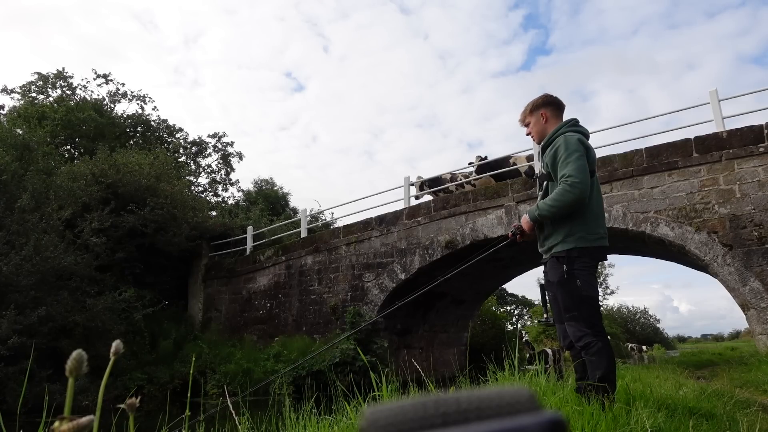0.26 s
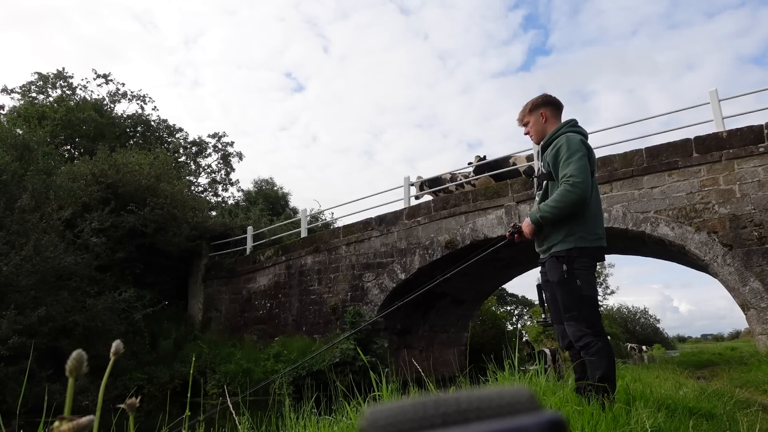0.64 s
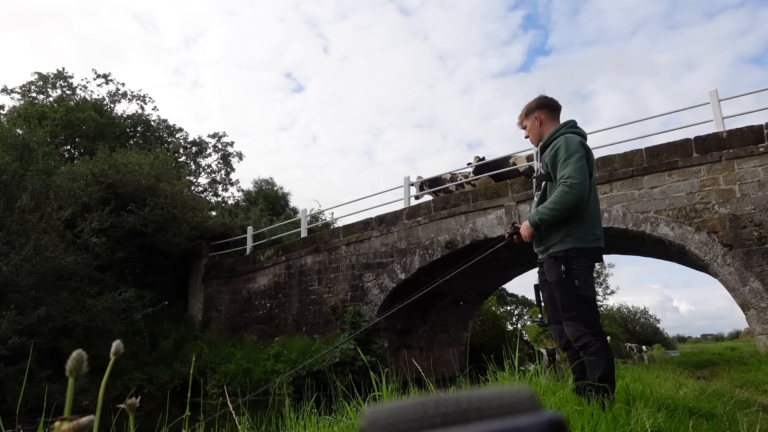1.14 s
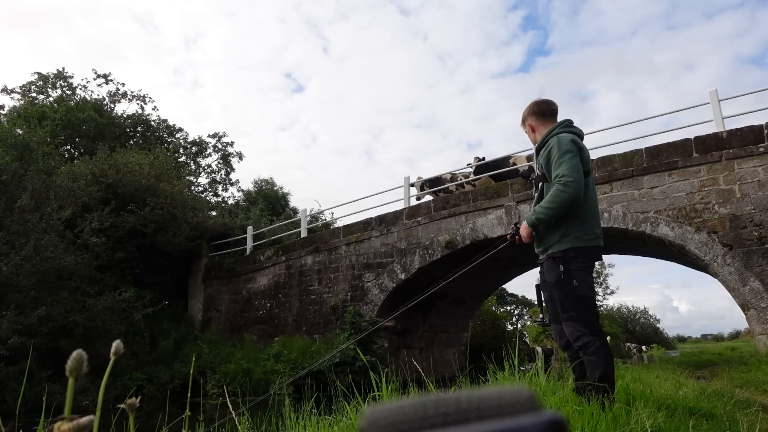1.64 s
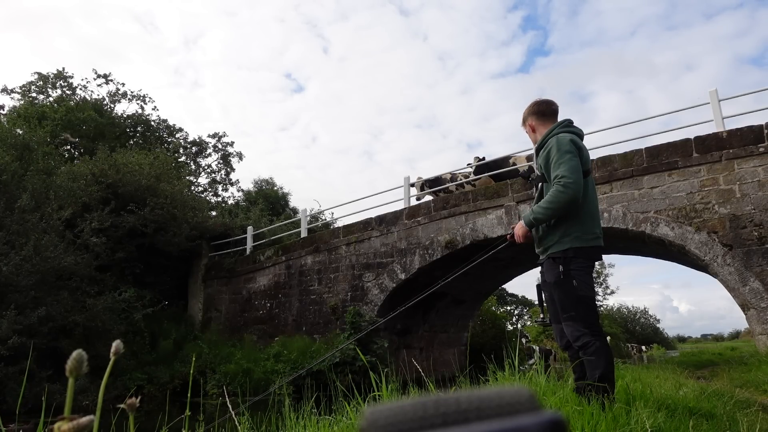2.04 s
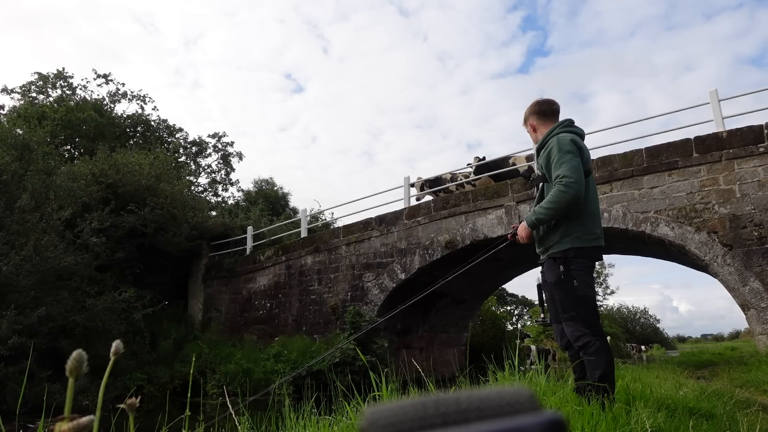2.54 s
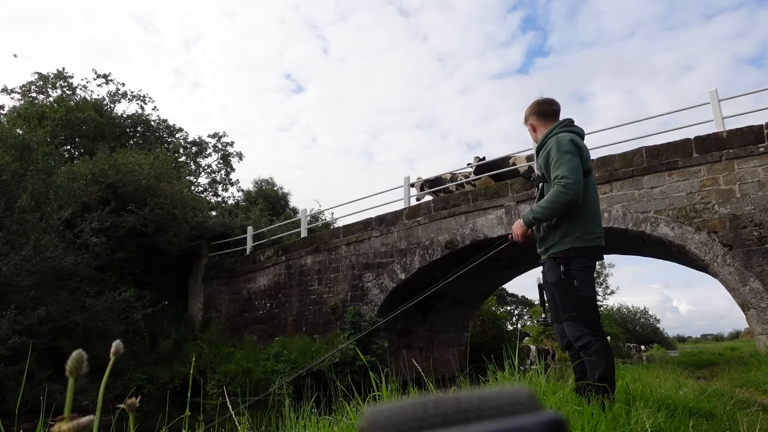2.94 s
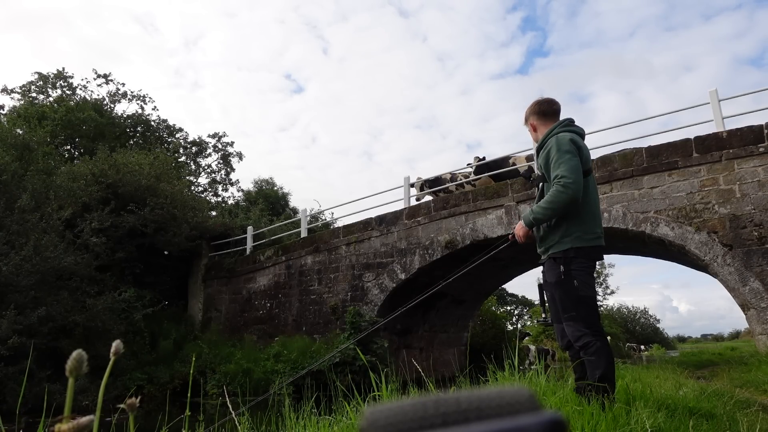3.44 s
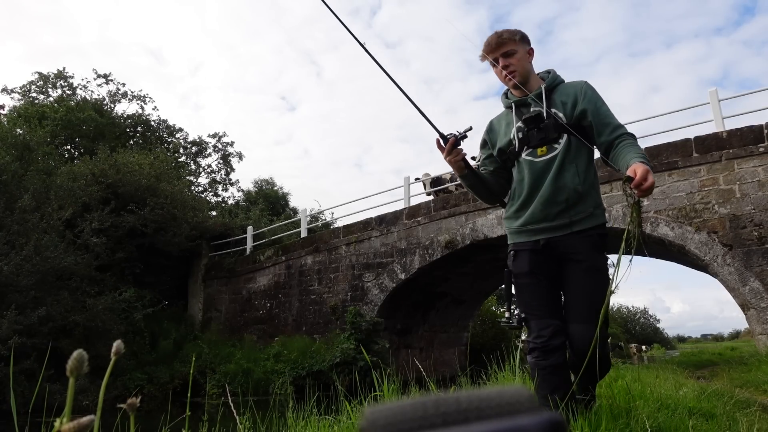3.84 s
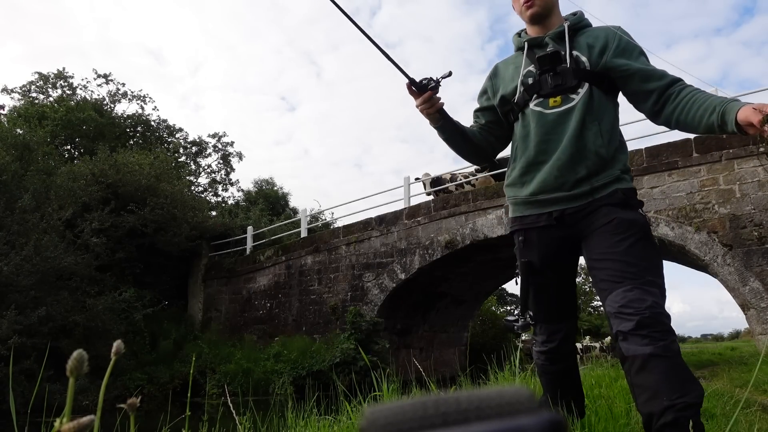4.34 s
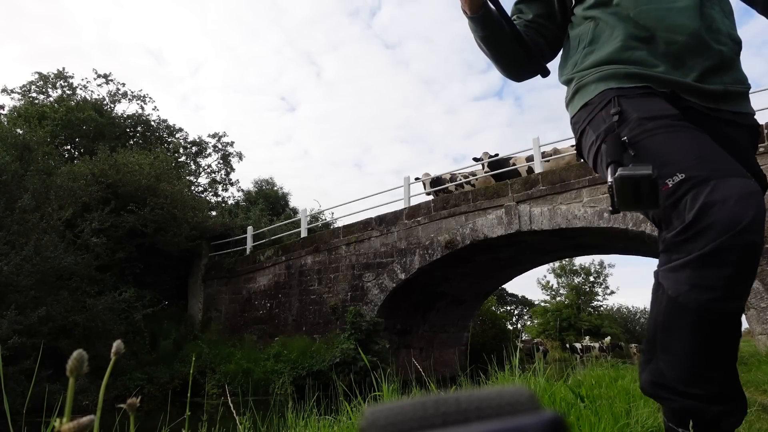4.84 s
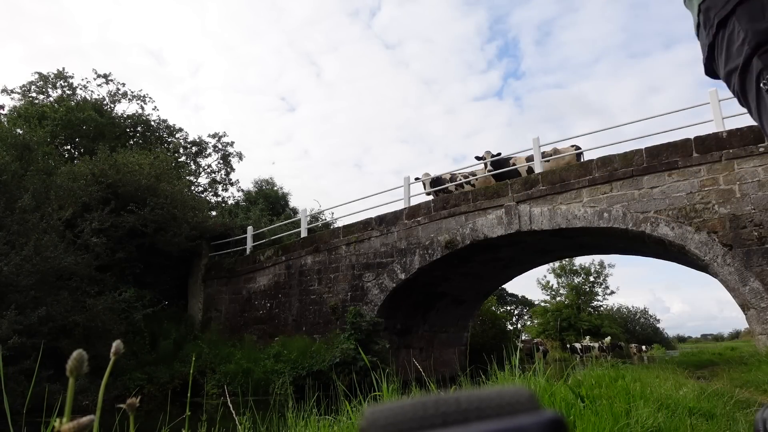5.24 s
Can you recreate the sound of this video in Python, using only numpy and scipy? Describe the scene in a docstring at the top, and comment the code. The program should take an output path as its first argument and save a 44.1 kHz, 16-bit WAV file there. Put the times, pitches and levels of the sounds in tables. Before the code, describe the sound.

Cows on a stone bridge bellow hoarsely and moo low while a small bird chirps, water drips, and an angler walks through grass with clicking tackle.

```python
"""By a stone canal bridge, cows call a little to the right: hoarse bellows and low moos, one breaking into a high register.
The moos are vocal-fold buzz and breath through throat resonances; the bellows are a strained tone over rasping noise.
A small bird sings in gliding notes to the left and water off weed trickles, splashes and drips as shaped noise.
An angler walks through grass in swishes and treads of grainy noise; his tackle clicks as short rings and
one rubber boot creaks by stick and slip. Soft noise is the air around the stereo microphone."""
import sys
import numpy as np
from scipy import signal
from scipy.fft import rfft, irfft
from scipy.io import wavfile
from scipy.ndimage import uniform_filter1d, map_coordinates

SR = 44100
rng = np.random.default_rng(int(sys.argv[2]) if len(sys.argv) > 2 else 0)


def put_to_file(sound):
    """Save the sound as 16-bit audio at rate SR, in the file named by the first command-line argument."""
    columns = np.atleast_2d(sound).T  # one column per channel
    safe = np.clip(columns, -1, 1)
    whole_steps = np.round(safe * 32767)
    wavfile.write(sys.argv[1], SR, whole_steps.astype(np.int16))


N = 241607
TIME = np.arange(N) / SR
BINS = np.fft.rfftfreq(4096, 1 / SR)  # filter frequencies in Hz


def amp(db):
    """Amplitude factor of a level in dB."""
    return 10 ** (np.asarray(db) / 20)


def unit(x):
    """Scaled to an RMS of one."""
    return x / np.sqrt(np.mean(x ** 2) + 1e-20)


def read(points, hz):
    """A short spectrum, joined on a log-frequency axis."""
    f, value = np.transpose(points)
    return np.interp(np.log(hz + 1), np.log(f + 1), value)


def controls(rows):
    """Sample times and every column of a curve table."""
    s, *columns = np.transpose(rows)
    t = np.arange(s[0], s[-1], 1 / SR)
    return [t] + [np.interp(t, s, c) for c in columns]


def placed(s, sound):
    """A sound set at its moment in silence."""
    return np.concatenate([np.zeros(max(round(s * SR), 0)), sound, np.zeros(N)])[:N]


def faded(x, size=400):
    """Smooth fades at both ends, size samples in all."""
    return x * signal.windows.tukey(len(x), min(1, size / len(x)))


def wander(size, hz):
    """Random drift up to about hz, of unit RMS over the whole scene's length."""
    f = np.fft.rfftfreq(N, 1 / SR)
    return unit(irfft(rfft(rng.standard_normal(N)) / (1 + (f / hz) ** 4), N))[:size]


def colour(x, db, lag=1):
    """Causal filter shaped by db on BINS, its peak set to 0 dB; lag above 1 makes resonances build up late."""
    log_gain = np.log(amp(np.maximum(db - db.max(), -100)))
    z = signal.hilbert(np.r_[log_gain, log_gain[-2:0:-1]])
    taps = np.fft.ifft(np.exp(z.real - 1j * lag * z.imag)).real
    return signal.oaconvolve(x, taps[:len(BINS)])[:len(x)]


def band(x, lo_hz, hi_hz):
    """Band-pass filter without delay."""
    return signal.sosfiltfilt(signal.butter(4, [lo_hz, hi_hz], "band", fs=SR, output="sos"), x)


def loudness(x, size=1300):
    """Running RMS, smoothed twice over size samples."""
    power = uniform_filter1d(uniform_filter1d(x ** 2, size), size)
    return np.sqrt(abs(power) + 1e-14)


def swells(events, attack_s, fall_db_per_s):
    """Joint gain of events (start, length, dB) that each rise, hold and die away."""
    gains = []
    for s, length, db in events:
        rise = np.clip((TIME - s) / attack_s, 0, 1)
        gains.append(rise * amp(db - fall_db_per_s * np.maximum(TIME - s - length, 0)))
    return np.linalg.norm(gains, axis=0)


def ears(left_db):
    """Gains of the left and right microphone, left_db apart."""
    return amp([[left_db / 2], [-left_db / 2]])


# Decay of the scatter. Each row: frequency in Hz, time to fall by 60 dB in seconds.
SCATTER_DECAY = [(100, 0.24), (500, 0.74), (2000, .4), (7000, 0.5), (16000, 0.053)]


def outdoors(x, left_db, wet_db, delay_s=0.011):
    """Direct sound, and scatter from the bridge and trees that differs at each ear and holds little bass."""
    taps = rng.standard_normal((2, SR // 2)) * (rng.random((2, SR // 2)) < .05)
    hz, t, z = signal.stft(taps, SR, nperseg=256)
    scatter_db = read([(100, -13.5), (300, -17.0), (900, 2.0), (3000, 7), (16000, 2.0)], hz)[:, None]
    decay_db = -60 * t / read(SCATTER_DECAY, hz)[:, None]
    tail = signal.istft(z * amp(scatter_db + decay_db), SR)[1]
    tail = np.pad(tail / np.linalg.norm(tail[0]), ((0, 0), (int(delay_s * SR), 0)))
    scatter = signal.fftconvolve(x[None], tail, axes=1)[:, :N]
    return ears(left_db) * x + amp(wet_db) * scatter


def rustle(gain, spectrum, grains_per_s, grain_db, same, left_db):
    """A wash of countless tiny contacts with sparse larger ones; same is the power share common to both ears."""
    sizes = amp(4.3 * np.minimum(rng.exponential(1, (3, N)), 3.5)) * rng.standard_normal((3, N))
    grains = unit(sizes * (rng.random(sizes.shape) < grains_per_s / SR))
    drive = rng.standard_normal(sizes.shape) + amp(grain_db) * grains
    shared, *own = (faded(gain * unit(colour(d, read(spectrum, BINS)))) for d in drive)
    return ears(left_db) * (np.sqrt(same) * shared + np.sqrt(1 - same) * np.array(own))


def ticks(rows, rise_s, top_hz):
    """Brief bursts that die away, each coloured by one ring and dulled above top_hz."""
    out, t = np.zeros(N), TIME[:SR // 8]
    for s, db, hz, t60, sharpness in rows:
        burst = rng.standard_normal(len(t)) * amp(-60 * t / t60) * (1 - np.exp(-t / rise_s))
        detune = (BINS + 1) / hz - hz / (BINS + 1)
        ring_loss = 1 + (sharpness * detune) ** 2
        treble_loss = 1 + (BINS / top_hz) ** 8
        tick = colour(burst, -10 * np.log10(ring_loss * treble_loss))
        out += placed(s, amp(db) * tick / abs(tick).max())
    return out


def whistle(t, hz, db, jitter):
    """A nearly pure, slightly unsteady tone."""
    turns = np.cumsum(hz * (1 + jitter * wander(len(t), 180))) / SR
    return placed(t[0], faded(np.sqrt(2) * amp(db) * np.sin(2 * np.pi * turns)))


# Air around the microphone. Each row: frequency in Hz, relative level in dB.
AIR_COLOUR = [(25, -32.5), (50, -18.5), (97, -2), (170, -6.5), (285, -1), (650, 0), (900, -14.5),
              (1500, -9.5), (2000, -17.5), (3600, -23.5), (6000, -25.5), (9000, -35), (16000, -39)]


def open_air():
    """Steady coloured noise with sparse grains, about half of it shared by the ears."""
    return rustle(amp(-55), AIR_COLOUR, 300, grain_db=-21.5, same=0.57, left_db=-0.5)


# Bird notes. Each row: start in seconds, length in seconds, start pitch in Hz, end pitch in Hz, peak level in dB.
BIRD_NOTES = [(0.441, .053, 6250, 7080, -56.5), (.469, 0.077, 7070, 6740, -57.5),
              (0.549, 0.093, 6780, 7000, -57.5), (0.734, 0.056, 5440, 5270, -60),
              (.778, 0.028, 4830, 3840, -59), (0.832, 0.047, 4870, 5550, -57.5),
              (0.933, 0.04, 5630, 5650, -47.5), (0.969, 0.065, 5350, 4040, -55),
              (1.065, 0.025, 5460, 5650, -48.5), (1.158, 0.036, 5750, 5040, -48.5),
              (1.231, 0.041, 4970, 3920, -57), (1.305, .06, 6200, 5970, -55),
              (1.428, .057, 7450, 6900, -60.5), (1.525, .1, 3780, 3730, -56),
              (1.684, 0.076, 5640, 5500, -56), (2.21, 0.089, 6310, 6810, -55),
              (2.553, 0.046, 3720, 4730, -53), (2.659, 0.16, 7300, 6760, -63),
              (2.919, 0.062, 7200, 6750, -57.5), (3.044, .049, 6150, 6030, -60.5),
              (3.127, 0.021, 3980, 5050, -55), (3.166, 0.086, 7020, 6800, -64),
              (3.347, 0.033, 6370, 5780, -56.5), (3.427, 0.1, 5300, 5560, -55),
              (3.609, 0.091, 6330, 6720, -60), (4.165, .04, 5470, 5080, -53.5)]


def bird():
    """Thin gliding tones to the left, each swelling a little to an early peak and then fading slightly."""
    song = np.zeros(N)
    for s, length, start_hz, end_hz, db in BIRD_NOTES:
        t, hz = controls([(s, start_hz), (s + length, end_hz)])
        shape_db = np.interp((t - s) / length, [0, 0.37, 1], [-3.5, 0, -5])
        song += whistle(t, hz, db + shape_db, jitter=.012)
    return outdoors(song, left_db=7.0, wet_db=-4.0)


# Water running off the weed, a single row: start in seconds, length in seconds, level in dB.
TRICKLE_EVENT = (2.58, 0.63, -52.5)
# Splashes of spray around the bigger drips. Each row: start in seconds, length in seconds, level in dB.
SPLASH_EVENTS = [(2.73, 0.0064, -49), (2.808, 0.13, -48.5), (2.5, 0.068, -49.5), (3.08, 0.073, -59),
                 (3.042, .02, -45)]
# Colour of trickle and splashes. Each row: frequency in Hz, relative level in dB.
WATER_COLOUR = [(120, -16), (200, 2), (843, -3), (1360, -0.5), (2280, -14.5), (2700, -8), (5460, -21.5),
                (7060, -25), (7690, -36), (12000, -44), (15600, -85), (22000, -120)]
# Drips and plops. Each row: start in seconds, peak level in dB, ring in Hz.
DRIP_EVENTS = [(.597, -38, 298), (2.644, -38.5, 1630), (2.735, -33, 3100), (2.812, -36.5, 1345),
               (2.835, -41.5, 2710), (2.852, -41, 1290), (2.915, -43, 970), (2.943, -38.5, 1050),
               (3.007, -36.5, 308), (3.055, -33, 1820), (3.123, -33.5, 406), (3.169, -43, 1700),
               (3.252, -45, 3000)]


def water():
    """Water trickles and splashes off the weed; the higher a drip rings, the sooner it dies."""
    attack_s = 0.0061
    trickle = swells([TRICKLE_EVENT], attack_s, fall_db_per_s=61)
    splashes = swells(SPLASH_EVENTS, attack_s, fall_db_per_s=172)
    wash = rustle(np.hypot(trickle, splashes), WATER_COLOUR, 800, grain_db=-2.5, same=0.9, left_db=-2.5)
    t60_at_1khz_s, shortening, sharpness = 0.055, 0.44, 4
    drips = [(s, db, hz, t60_at_1khz_s * (1000 / hz) ** shortening, sharpness) for s, db, hz in DRIP_EVENTS]
    return wash + outdoors(ticks(drips, rise_s=0.0021, top_hz=4100), left_db=-1.5, wet_db=-9.5)


# The whole walk, a single row: start in seconds, length in seconds, swish of grass and cloth in dB, soft tread in dB.
WALK_EVENT = (3.5, 2.3, -53, -49.5)
# Legs sweeping through the grass. Each row: start in seconds, length in seconds, swish in dB, tread in dB.
STRIDE_EVENTS = [(3.51, 0.077, -51, -40.5), (3.89, 0.085, -47, -50), (4.25, 0.1, -53, -48),
                 (4.66, 0.053, -49.5, -68), (4.78, .07, -49.5, -72), (5.118, .27, -44, -68)]
# Colour of grass and cloth. Each row: frequency in Hz, relative level in dB.
GRASS_COLOUR = [(350, -58), (600, 0.5), (688, -3), (812, -12), (894, -3), (1140, 0.5), (1310, -3),
                (1980, 0.5), (4500, -2), (7620, -10), (11500, -20.5), (16000, -33)]
# Colour of the tread. Each row: frequency in Hz, relative level in dB.
FOOT_COLOUR = [(35, -41), (60, -17), (228, -3.5), (260, -4.5), (301, 4.5), (496, -10.5), (566, -32),
               (628, -8), (854, -23.5), (2000, -17), (2600, -106), (4400, -120)]


def walking():
    """Each stride swishes grass and cloth and treads softly, over the steady rustle of the walk."""
    moves = [WALK_EVENT, *STRIDE_EVENTS]
    attack_s, fall_db_per_s = 0.0082, 182
    swish = swells([(s, length, db) for s, length, db, _ in moves], attack_s, fall_db_per_s)
    weight = swells([(s, length, db) for s, length, _, db in moves], attack_s, fall_db_per_s)
    # uneven tufts make the swish flicker
    patches = amp(1.5 * wander(N, 19))
    grass = rustle(swish * patches, GRASS_COLOUR, 1500, grain_db=-5.5, same=0.74, left_db=-3.5)
    return grass + rustle(weight, FOOT_COLOUR, 300, grain_db=-10, same=.98, left_db=-.3)


# Tackle clicks and the ringing after the loudest.
# Each row: start in seconds, peak level in dB, ring in Hz, 60 dB decay in seconds, sharpness of the ring.
TACKLE_CLICKS = [(3.922, -36, 6900, 0.023, 8.3), (4.6454, -11.5, 4600, 0.013, 1.04),
                 (4.647, -11, 4540, 0.0079, 4.2), (4.656, -28.5, 8050, 0.075, 4),
                 (4.657, -28, 4650, 0.083, 6), (4.801, -34.5, 2360, 0.068, 4),
                 (4.817, -30, 2700, 0.016, 3.6), (4.9275, -23, 3020, 0.013, 17),
                 (4.95, -29.5, 3670, 0.0028, 5.6), (5.221, -34, 7700, .033, 10),
                 (5.242, -26, 3600, 0.0064, 5)]


def tackle():
    """Sudden hard clicks as short noise bursts; the loudest is followed by a fainter ringing tail."""
    clicks = ticks(TACKLE_CLICKS, rise_s=.0002, top_hz=10300)
    return outdoors(clicks, left_db=-3.5, wet_db=-18.5, delay_s=.001)


# Boot creaks. Each row: start in seconds, length in seconds, body level in dB, snap level in dB.
CREAK_EVENTS = [(5.12, 0.024, -28, -46.5), (5.151, 0.023, -34, -40.5)]
# Colour of the boot's body. Each row: frequency in Hz, relative level in dB.
BODY_COLOUR = [(59, -50), (100, -21), (235, 9.5), (465, 4), (799, -5.5), (895, -0.5), (1120, -4),
               (1300, -11), (2290, -19), (3000, -24), (3900, -44), (6600, -120)]
# Colour of the snaps. Each row: frequency in Hz, relative level in dB.
RUBBER_SNAP_COLOUR = [(1060, -25), (1800, 7), (2060, -10), (2920, -6), (4450, -10), (11200, -12),
                      (16000, -23)]


def boot():
    """Rubber sticks and slips, ever more slowly: every slip thumps the boot and gives a snap."""
    start = CREAK_EVENTS[0][0]
    t = np.arange(0, .19, 1 / SR)
    slip_hz = 223.4 - 90 * t
    turns = np.cumsum(slip_hz * (1 + 0.034 * wander(len(t), 140))) / SR
    slips = np.diff(np.floor(turns), prepend=-1) * amp(2 * wander(len(t), 300))
    scrape = rng.standard_normal(len(t)) * np.exp(-(turns % 1) / 0.32)
    body = colour(unit(slips - slips.mean()) + .5 * unit(scrape), read(BODY_COLOUR, BINS))
    snap = colour(scrape, read(RUBBER_SNAP_COLOUR, BINS))
    body_gain = swells([(s, length, db) for s, length, db, _ in CREAK_EVENTS], attack_s=0.015, fall_db_per_s=156)
    snap_gain = swells([(s, length, db) for s, length, _, db in CREAK_EVENTS], attack_s=0.015, fall_db_per_s=480)
    creak = body_gain * placed(start, faded(unit(body))) + snap_gain * placed(start, faded(unit(snap)))
    return outdoors(creak, left_db=3.5, wet_db=-18.0)


def throat(x, modes, skirt=1.35, low_hz=140):
    """Resonances with steep skirts; a cow radiates little bass."""
    power = sum(amp(db) ** 2 / (1 + ((BINS - hz) / (0.76 * width)) ** 2) ** skirt for hz, width, db in modes)
    bass_loss = 1 + (low_hz / (BINS + 1)) ** 8
    return colour(x, 10 * np.log10(power / bass_loss), lag=1.5)


# Antiresonances of the nose. Each row: centre in Hz, width in Hz, gain in dB.
NOSE_NOTCHES = [(1230, 48, -9.5), (2254, 49, -4.5)]


def notched(x):
    """The nasal passages swallow narrow bands of the voice."""
    return colour(x, sum(db * np.exp(-((BINS - hz) / width) ** 2) for hz, width, db in NOSE_NOTCHES))


def moo(rows, mouth, modes, jitter, breath_db, hiss_db):
    """Regular closures of the vocal folds, each with a puff of air, ring the throat; an open mouth lets out the upper bands."""
    t, hz, db = controls(rows)
    widest_s, open_middle_db, open_treble_db, start_db, end_db = mouth
    closed = np.interp(t, [t[0], widest_s, t[-1]], [1, 0, 1])
    closing_db = np.where(t < widest_s, start_db, end_db) * closed ** 2
    # levels against the low band, held at least 7.5 dB under it
    middle_db = np.minimum(open_middle_db - closing_db - db, -7.5)
    treble_db = np.minimum(open_treble_db - closing_db - db, -7.5)

    turns = np.cumsum(hz * (1 + jitter * wander(len(t), 75))) / SR
    folds = unit(sum(np.cos(2 * np.pi * k * turns) for k in range(1, int(8000 / hz.max()))))
    puffs = unit((.25 + np.exp(-(turns % 1) / .2)) * rng.standard_normal(len(t)))
    # towards the top the buzz gives way to air noise
    buzz = colour(folds, read([(2200, 3.0), (3500, -14.5), (8000, -25.5)], BINS))
    air = amp(hiss_db) * colour(puffs, read([(800, breath_db - hiss_db), (2000, -2.0), (3200, 1.0)], BINS))
    voice = faded(notched(throat(buzz + air, modes, low_hz=164)))

    low, middle, high = band(voice, 70, 650), band(voice, 650, 1050), band(voice, 1050, 12000)
    voice = low / loudness(low)
    voice += amp(middle_db) * middle / loudness(middle, size=6000)
    voice += amp(treble_db) * high / loudness(high)
    return placed(t[0], faded(amp(db) * voice, size=1100))


# Partials of the strained tone. Each row: multiple of the pitch, relative level in dB.
TONE_PARTIALS = [(.5, -20), (1, 2), (2, -8), (3, -22.5), (4, -25)]
# Throat of the bellowing cow. Each row: resonance in Hz, width in Hz, relative level in dB, before the mouth shifts them.
BELLOW_MODES = [(244, 14, 0.5), (312, 65, -1), (448.5, 56, -3.5), (572, 91, -3), (773, 85, 2),
                (895, 46, -7), (1050, 230, -11.5), (1476, 300, -8.5), (1678, 100, -7), (1957, 116, -10),
                (2330, 470, -17.5), (3545, 170, -23), (4640, 400, -35), (5770, 950, -41.5)]


def bellow(row, jitter, shimmer):
    """A strained high tone over chaotic flapping of the folds, which rasps through the open mouth; it swells, settles, then collapses."""
    start, settle, climax, collapse_s, top_hz, tone_db, rasp_db, treble_db, landing_db = row
    t = np.arange(start, climax + 2 * collapse_s, 1 / SR)
    before, after = np.maximum(climax - t, 0), np.maximum(t - climax, 0)
    collapse = np.sin(np.pi / 2 * np.minimum(after / collapse_s, 1)) ** 2
    # roughness: near 1 at first, .16 once settled, raised again by the collapse
    calm, settling_s = .16, .05
    chaos = calm + (1 - calm) / (1 + np.exp((t - settle) / settling_s)) + 0.57 * collapse
    # chaos and collapse both lower the pitch
    hz = top_hz * (1 - .1 * chaos) * (1 - 0.45 * collapse)
    mouth = 1 - .17 * before ** 2 - .06 * collapse

    # each layer climbs to the climax on a parabola (dB per s squared), then falls (dB per s)
    line_db = tone_db - 55.7 * before ** 2 + (landing_db - tone_db) * collapse
    line_db += -6.5 * np.sin(np.pi * collapse)  # brief dip during the collapse
    line_db -= 1097 * np.maximum(after - collapse_s, 0)
    low_db = rasp_db - 44.8 * before ** 2 - 334 * after
    high_db = treble_db - 38.8 * before ** 2 - 334 * after

    turns = np.cumsum(hz * (1 + jitter * chaos * wander(len(t), 80))) / SR
    tone = np.sqrt(2) * sum(amp(db) * np.cos(np.pi * round(2 * k) * turns) for k, db in TONE_PARTIALS)
    # unsettled folds smear the tone into sidebands
    flutter = wander(len(t), 95) * np.cos(2 * np.pi * turns) + wander(len(t), 95) * np.sin(2 * np.pi * turns)
    tone += amp(-4) * chaos * flutter
    # the tone sets in at most .54 s before the climax
    onset = np.clip((.54 - before) / 0.024, 0, 1)
    tone *= onset * amp(line_db) * (1 + shimmer * chaos * wander(len(t), 90))

    flaps = (0.45 + np.exp(-(turns % 1) / 0.41)) * amp(2 * wander(len(t), 230)) * rng.standard_normal(len(t))
    # uneven beating of the false folds pulses the rasp
    growl_hz = 68.5 * (1 + .25 * wander(len(t), 30))
    flaps *= 1 + 0.22 * np.cos(2 * np.pi * np.cumsum(growl_hz) / SR)
    # opening the mouth raises all resonances together: the rasp is read out faster
    stretch = np.cumsum(mouth)
    rasp = throat(np.resize(flaps, int(stretch[-1]) + 2), BELLOW_MODES, skirt=1.875, low_hz=181)
    rasp = faded(map_coordinates(rasp, [stretch], order=3, mode="nearest"))
    low = band(rasp, 90, 1100) / loudness(band(rasp, 560, 1100))
    high = band(rasp, 1100, 14000)
    voice = faded(tone + amp(low_db) * low + amp(high_db) * high / loudness(high))
    return placed(t[0], band(voice, 150, 14000))


# Curves of the two low moos and of the high register that the rising one breaks into.
# Each row: time in seconds, pitch in Hz, level of the low band in dB.
RISING_CURVE = [(1.14, 66.1, -58.5), (1.155, 67.45, -57), (1.164, 68.3, -49.5), (1.214, 75.35, -36),
                (1.259, 88.8, -34), (1.282, 91.6, -33), (1.388, 102.5, -29), (1.488, 120.3, -28),
                (1.51, 117.5, -31)]
LONG_CURVE = [(3.29, 71.73, -55.5), (3.388, 74.3, -35.5), (3.482, 81.8, -34), (3.592, 86.5, -31),
              (3.762, 93.7, -31), (4.026, 100.3, -26), (4.136, 98.1, -27), (4.214, 94.96, -33),
              (4.302, 89.04, -32), (4.434, 74.5, -35), (4.458, 72.9, -37.5), (4.51, 66.2, -58)]
HIGH_CURVE = [(1.5, 218.3, -26), (1.53, 230.8, -20), (1.578, 248.8, -17), (1.632, 252.6, -18),
              (1.714, 248.6, -21), (1.748, 262.8, -25), (1.768, 266, -44.5), (1.79, 272, -52.5)]
# Throat and nose resonances of each. Each row: centre in Hz, width in Hz, relative level in dB.
RISING_MODES = [(224, 63, -2), (312, 68, -16), (489.4, 110, -7.5), (773, 55, -7.5), (1170, 130, -12.5),
                (1474, 48, -6), (1637, 96, -10), (1990, 71, -11), (2490, 310, -22), (3760, 110, -33.5),
                (4260, 150, -37)]
LONG_MODES = [(214, 76, 6.5), (276, 120, -16), (370, 39, -3), (508.6, 68, 6), (818, 52, -0.5),
              (1160, 66, -4), (1456, 51, -9), (1647, 40, -14), (1998, 71, -16.5), (2457, 78, -16.5),
              (2890, 91, -18.5)]
HIGH_MODES = [(257, 64, -14), (509, 45, -20.5), (726, 76, -27.5), (1015, 120, -51.5), (1530, 170, -15.5),
              (1743, 85, -17), (2194, 280, -24), (3700, 900, -60.5)]
# Mouth of each; if widest lies outside the call, the mouth only opens or only closes.
# A single row: widest in seconds, middle band then in dB, treble then in dB, loss at the start in dB, loss at the end in dB.
RISING_OPENING = (1.08, -38.5, -36, 9, 1.5)
LONG_OPENING = (3.5, -38.4, -37, 18, 14)
HIGH_OPENING = (9, -31.5, -40.5, 4, 18.5)
# Bellows. Each row: start in seconds, folds settling in seconds, climax in seconds, collapse length in seconds,
# pitch in Hz before sagging, then in dB: tone, rasp and treble at the climax, and tone after the collapse.
BELLOW_CALLS = [(0.0, .06, .42, .068, 436.4, -24.5, -31.5, -36, -35),
                (1.75, 2.251, 2.525, .058, 441, -21, -30, -33.5, -24)]
# Thin whistle of the throat leading into the second bellow. Each row: time in seconds, pitch in Hz, level in dB.
WHEEZE_CURVE = [(1.76, 848, -45.5), (1.8, 888, -53.5), (1.88, 882, -42.5), (1.9, 775, -48.5),
                (1.944, 814, -42), (1.962, 732, -37), (2.045, 719, -35)]
# Balance of the voices at the microphones. Each row: frequency in Hz, left minus right in dB, on top of left_db.
VOICE_BALANCE = [(100, -.4), (250, -.7), (500, -1.4), (1000, -2.8), (2000, -2), (8000, -1)]


def cows():
    """The calls from the bridge, a little to the right."""
    calls = moo(RISING_CURVE, RISING_OPENING, RISING_MODES, jitter=.003, breath_db=-8.5, hiss_db=2.5)
    calls += moo(LONG_CURVE, LONG_OPENING, LONG_MODES, jitter=0.0016, breath_db=-12.5, hiss_db=-2.5)
    calls += moo(HIGH_CURVE, HIGH_OPENING, HIGH_MODES, jitter=0.0054, breath_db=-11.5, hiss_db=12)
    calls += sum(bellow(row, jitter=.1, shimmer=0.36) for row in BELLOW_CALLS)
    calls += whistle(*controls(WHEEZE_CURVE), jitter=0.025)
    left, right = outdoors(calls, left_db=0.5, wet_db=-15.0)
    shade_db = read(VOICE_BALANCE, BINS)
    # colour() lifts its peak to 0 dB; amp() restores the level
    return np.array([amp(shade_db.max()) * colour(left, shade_db), right])


def scene():
    """All layers at the two microphones, from the background to the cows."""
    return open_air() + bird() + water() + walking() + tackle() + boot() + cows()


def record(dry):
    """The recorder passes nothing much above its band limit of 15750 Hz."""
    low_pass = signal.firwin(511, 15750, window=("kaiser", 9), fs=SR)
    return signal.oaconvolve(dry, low_pass[None], "same")


dry = scene()
out = record(dry)
put_to_file(out)
```